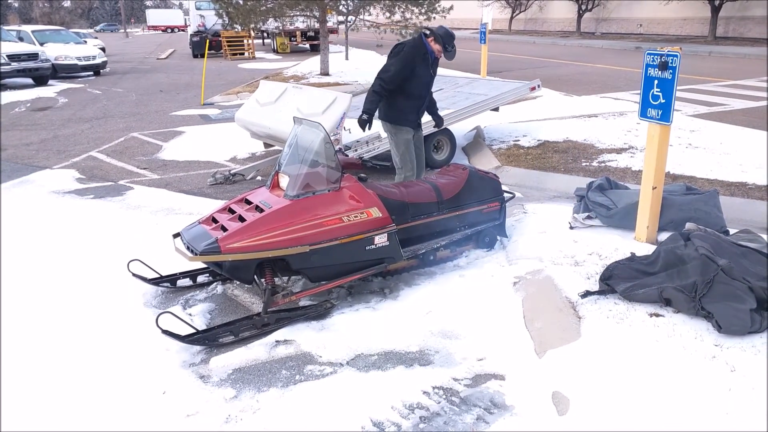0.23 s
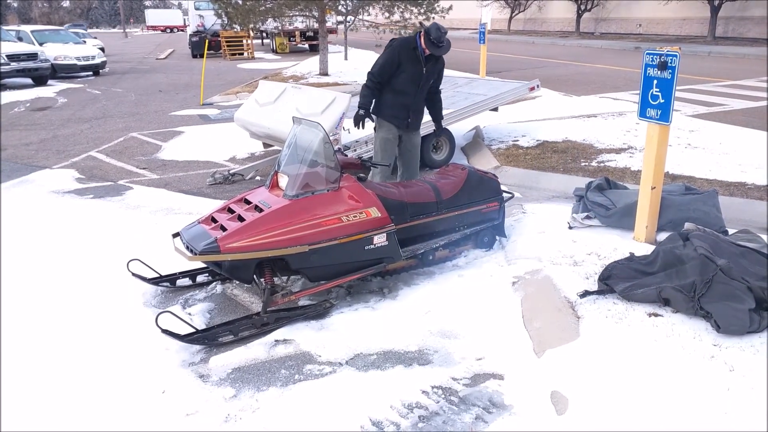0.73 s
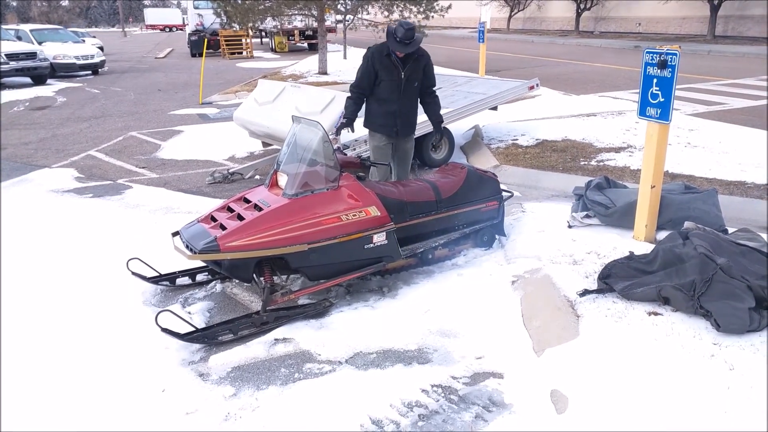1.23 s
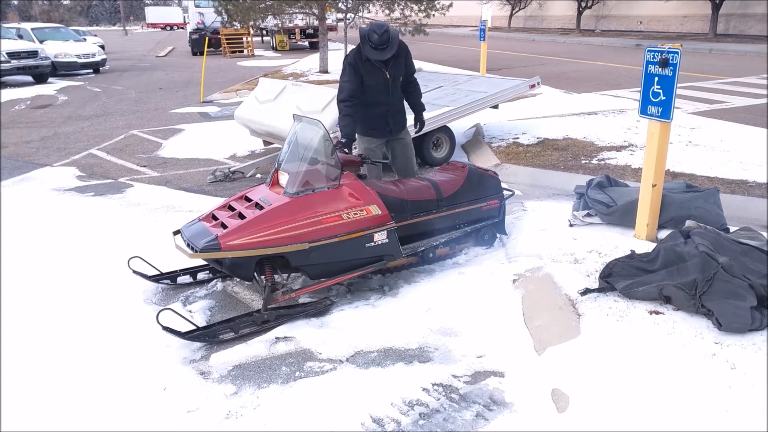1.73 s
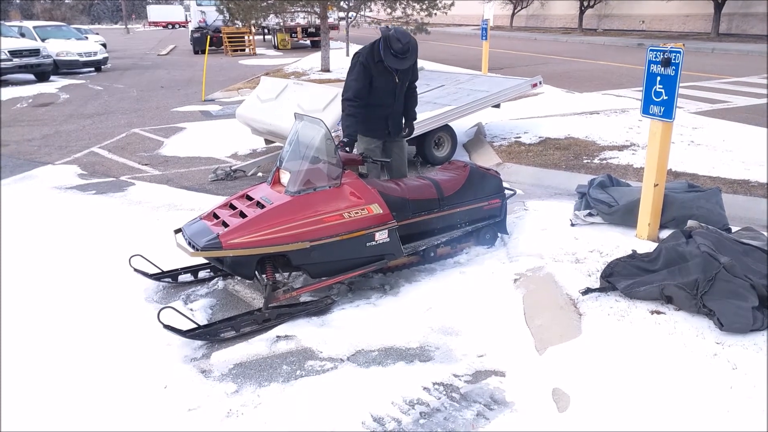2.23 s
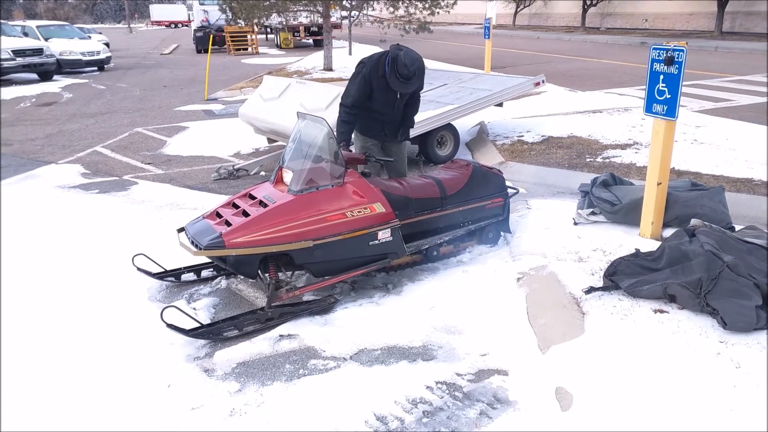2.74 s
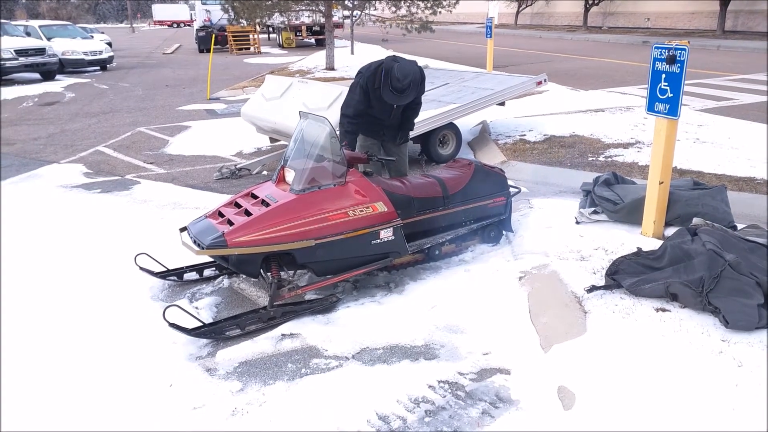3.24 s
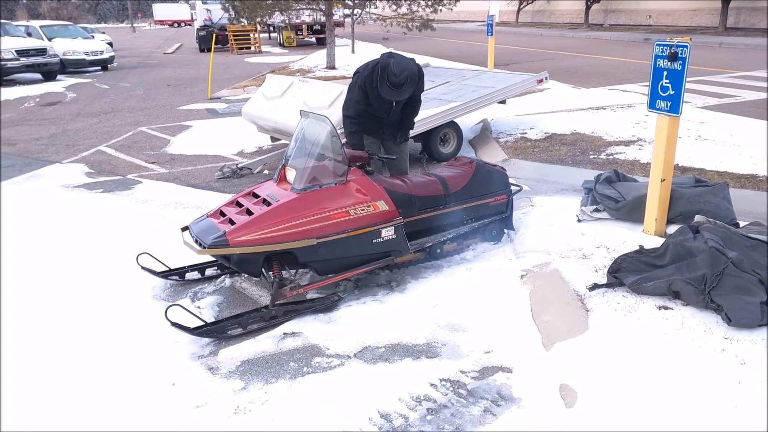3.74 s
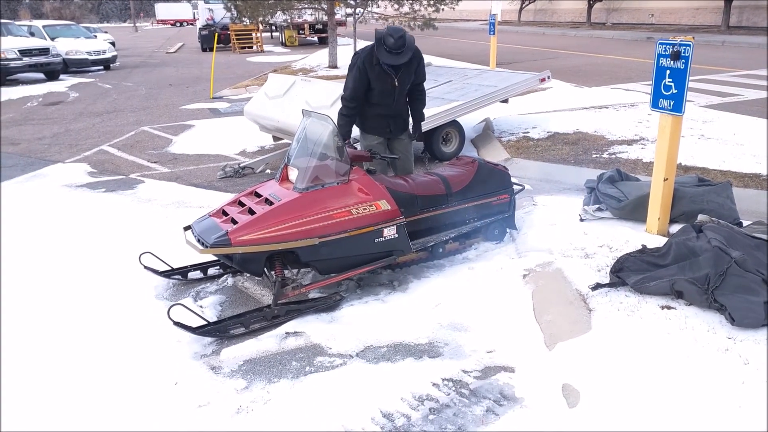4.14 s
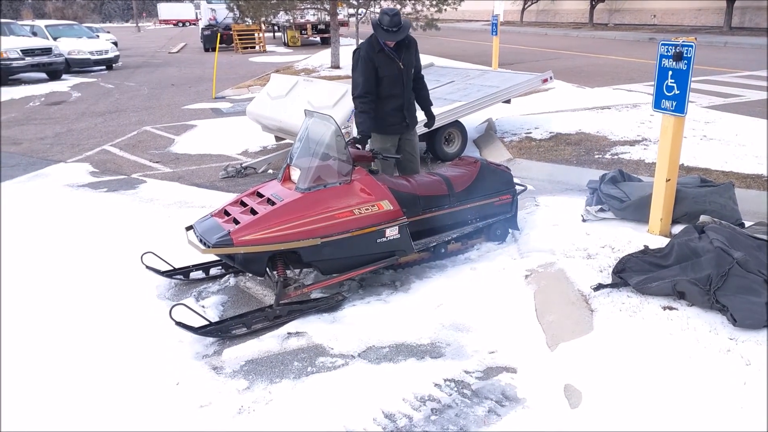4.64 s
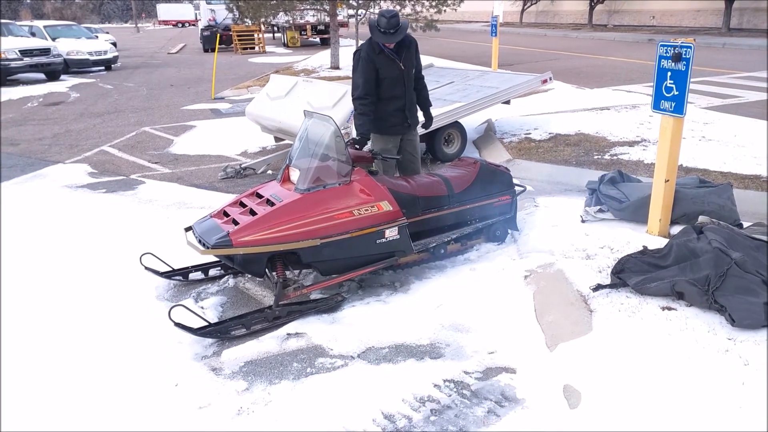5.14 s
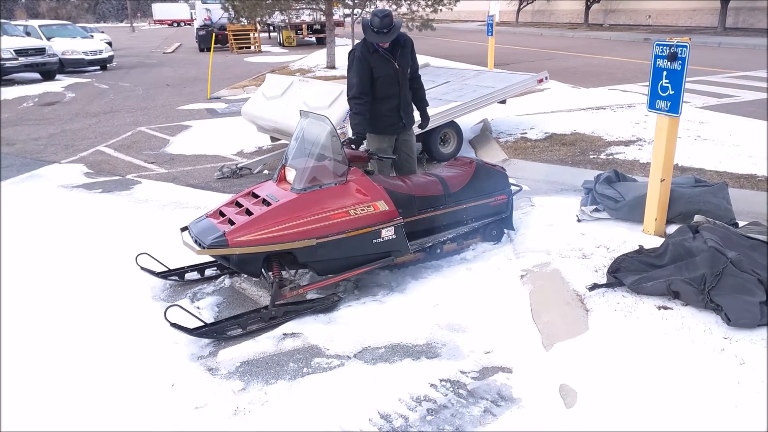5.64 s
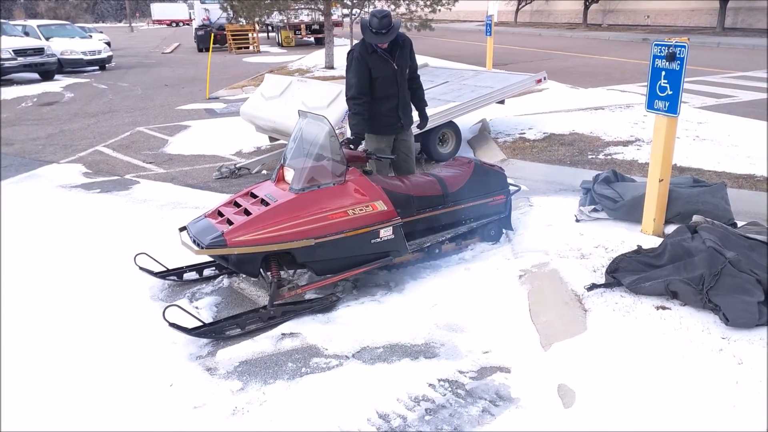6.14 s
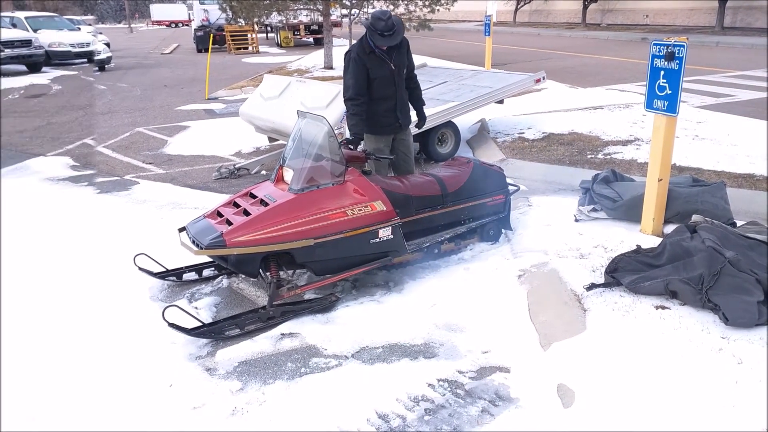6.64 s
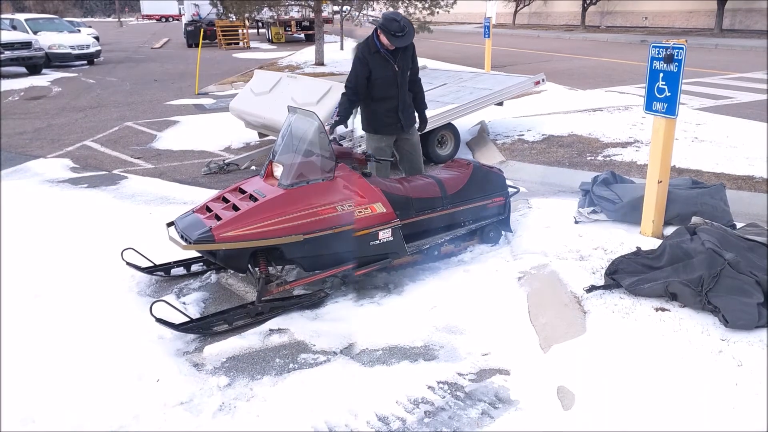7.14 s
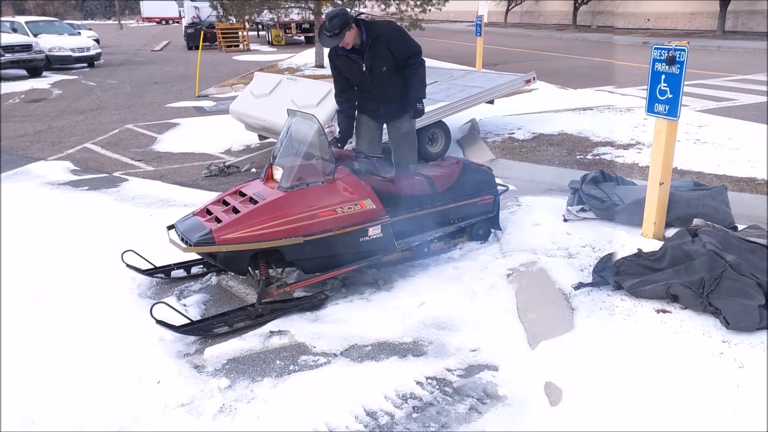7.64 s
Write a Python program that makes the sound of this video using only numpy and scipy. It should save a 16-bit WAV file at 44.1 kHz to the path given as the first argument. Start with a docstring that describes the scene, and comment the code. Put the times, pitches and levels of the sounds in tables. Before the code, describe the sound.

A two-stroke snowmobile engine idles a few metres away in the open, with no room echo. Deep exhaust pops come in irregular pairs about five times a second over low, ragged burble. Sprays of bright metallic clutch chatter, faint rings and a clattering fan sit on top. After about five seconds throttle makes it louder, more regular and raspy, with a low drone that rises and sags.

```python
"""A two-stroke twin snowmobile idles unevenly on snow in an open car park, a few metres from the microphone.
Short runs of strokes fire hard and pop out of the muffler as deep swings; the rest burble as puffs of noise.
The loose drive clutch chatters in sprays of tiny impacts and rings; pistons and fan clatter under the hood.
From about 5 s throttle makes it louder and more regular: engine orders drone in the pipe, and it coughs once."""
import sys
import numpy as np
from scipy import signal
from scipy.fft import rfft, irfft
from scipy.io import wavfile

SR = 44100
rng = np.random.default_rng(int(sys.argv[2]) if len(sys.argv) > 2 else 0)


def store_pcm(level_fs):
    """Save levels as 16-bit WAV."""
    pcm = np.round(np.clip(level_fs, -1, 1) * 32767).astype(np.int16)
    wavfile.write(sys.argv[1], SR, np.atleast_2d(pcm).T)


N = 347508
TIME = np.arange(N) / SR


def gain_of(db):
    """Amplitude factor of a level in dB."""
    return 10 ** (np.asarray(db) / 20)


def evened(x):
    """Scales to rms 1."""
    return x / np.sqrt(np.mean(x ** 2) + 1e-20)


def curve(rows, axis=1):
    """One column of a table at every sample."""
    rows = np.array(rows)
    return np.interp(TIME, rows[:, 0], rows[:, axis])


def spectrum_db(points, hz):
    """A spectrum's dB at any frequency, read along a log frequency scale."""
    point_hz, db = np.transpose(points)
    return np.interp(np.log(hz + 1), np.log(point_hz), db)


def colour(x, points, peaks=()):
    """Filters by a smooth spectrum with resonance bumps on it."""
    hz = np.fft.rfftfreq(2 * N, 1 / SR)
    bumps = sum(height / (1 + (2 * (hz - centre) / width) ** 2) for centre, width, height in peaks)
    return irfft(rfft(x, 2 * N) * gain_of(spectrum_db(points, hz) + bumps))[:N]


def clicks(times, sizes):
    """One impulse at each time."""
    at = np.round(np.asarray(times) * SR).astype(int)
    inside = (at >= 0) & (at < N)
    return np.bincount(at[inside], np.asarray(sizes)[inside], N)


def dying(x, seconds):
    """Gives every impulse an exponential tail."""
    return signal.lfilter([1], [1, -np.exp(-1 / (seconds * SR))], x)


def grit():
    """Noise made of thousands of tiny impacts a second."""
    return evened(rng.standard_normal(N) * (rng.random(N) < .25))


# The hand on the throttle: start_s, strokes_per_s, opening_0_to_1, firing_evenness_0_to_1
THROTTLE = [(0, 56.4, 0.1, 0.15), (5.1, 54.3, 0.08, 0), (5.25, 52, 0.5, 0.7), (5.45, 47.8, 0.34, .92),
            (5.82, 45, .4, 0.7), (6.1, 55.5, 0.92, .68), (6.52, 60.2, 1, .78), (6.9, 53.8, 1, 0.65),
            (7.1, 49, 0.87, 0.57), (7.55, 46, 0.74, 0.79), (7.82, 41.8, 1, 0.72)]
# Runs of hard firings, about five a second: start_s, firings_in_run
HARD_RUNS = [(0.021, 1), (.086, 1), (.210, 2), (.422, 1), (.598, 1), (.758, 1), (.901, 2), (1.086, 2),
             (1.265, 2), (1.417, 2), (1.604, 2), (1.788, 2), (2.006, 2), (2.186, 2), (2.366, 2), (2.517, 2),
             (2.661, 2), (2.786, 2), (3.002, 2), (3.184, 2), (3.365, 2), (3.543, 2), (3.724, 2), (3.905, 2),
             (4.089, 2), (4.272, 2), (4.456, 2), (4.637, 2), (4.820, 2), (5.025, 1), (5.176, 2), (5.505, 2),
             (5.712, 1), (5.859, 1), (6.007, 1), (6.161, 1), (6.490, 1), (6.586, 2), (6.655, 2), (6.730, 3),
             (6.921, 1), (7.016, 1), (7.046, 1), (7.104, 1), (7.198, 2), (7.285, 2), (7.365, 2), (7.420, 3),
             (7.559, 2), (7.669, 1), (7.774, 2)]
IDLE_ENDS_S = 5.3
IDLE_STROKES = 3  # at idle every third stroke of a run fires hard; under throttle, each one


def hard_firings():
    """Each run starts at its time and repeats in step with the crank."""
    start_s, count = np.array(HARD_RUNS).T
    strokes_apart = np.where(start_s < IDLE_ENDS_S, IDLE_STROKES, 1)
    gap_s = strokes_apart / np.interp(start_s, TIME, curve(THROTTLE))
    return np.concatenate([s + gap * np.arange(round(k)) for s, gap, k in zip(start_s, gap_s, count)])


def weak_strokes(hard):
    """The crank turns on evenly between hard firings: the times of the strokes that half fire."""
    hard = np.concatenate([[0], np.sort(hard), [N / SR]])
    turns = np.interp(hard, TIME, np.cumsum(curve(THROTTLE)) / SR)
    steps = np.maximum(np.round(np.diff(turns)), 1).astype(int)
    return np.concatenate([np.linspace(a, b, k + 1)[1:-1] for a, b, k in zip(hard, hard[1:], steps)])


# Strength of the exhaust flow: start_s, level_db
EFFORT = [(0.1, -13), (0.53, -14.5), (0.64, -13.5), (6.21, -12.5), (7.8, -9)]


def pops(hard, weak, pop_db=3.5, scatter_db=1.0, weak_db=-11, weak_scatter_db=4.5,
         follow=0.52, swing_s=0.0021, longer=0.043, lean=0.058):
    """The muffler rounds each firing into one deep swing between two crests; more gas makes it louder and longer."""
    hard_db = pop_db + scatter_db * rng.uniform(-1.77, 1, len(hard))
    half_db = weak_db + weak_scatter_db * rng.uniform(-1.77, 1, len(weak))
    times, levels = np.concatenate([hard, weak]), np.concatenate([hard_db, half_db])
    width_s = swing_s * (1 + longer * curve(THROTTLE, axis=2))
    out = np.zeros(N)
    for s, db in zip(times, levels):
        near = slice(max(round(s * SR) - SR // 60, 0), round(s * SR) + SR // 60)
        u = (TIME[near] - s) / width_s[near]
        swing = (u ** 2 - 1 + lean * u) * np.exp(-u ** 2 / 2)
        out[near] += gain_of(db) * swing
    return gain_of(follow * curve(EFFORT)) * out  # follows only part of the flow's dB


# How the muffler colours the puffs: pitch_hz, level_db
MUFFLER = [(12, -33), (25, -19), (40, -10.5), (57, -2), (75, 2), (110, -1.5), (152, -1), (180, -10.5),
           (230, -14.5), (270, -17.5), (350, -25.5), (450, -39.5), (800, -36), (2500, -87)]


def burble(hard, weak, burble_db=-3, puff_s=0.0019, steady=0.58, sweep_s=0.0042):
    """Half firings leave ragged puffs of gas that rumble in the muffler; each hard firing sweeps them aside."""
    puffs = (steady + dying(clicks(weak, np.ones(len(weak))), puff_s)) * rng.standard_normal(N)
    flow = np.tanh(.5 * evened(colour(puffs, MUFFLER)))  # the outlet limits the flow
    sweep = signal.windows.gaussian(SR // 20, sweep_s * SR / 2)
    swept = signal.oaconvolve(clicks(hard, np.ones(len(hard))), sweep, "same")
    return gain_of(burble_db + curve(EFFORT)) * evened(flow * (1 - .8 * swept))


# How the pipe passes the engine's orders: pitch_hz, level_db
PIPE = [(50, -11), (70, -8), (84, 0.5), (94, 3.5), (115, -7.5), (135, -15), (190, -12), (230, -5),
        (265, -14.5), (310, -14.5), (420, -31.5)]


def drone(drone_db=-4, waver_db=3.0, wander=.025):
    """As firing evens out, engine orders sound through the pipe's resonances; the crank speed wanders."""
    knots = np.linspace(0, N / SR, 200)
    # row 0 wanders the speed, rows 1 to 6 waver the level of each order
    waver = [np.interp(TIME, knots, row) for row in rng.standard_normal((7, len(knots)))]
    hz = curve(THROTTLE)
    turns = np.cumsum(hz * (1 + wander * waver[0])) / SR
    orders = np.zeros(N)
    for k in range(1, 7):
        level_db = spectrum_db(PIPE, k * hz) + waver_db * waver[k]
        orders += gain_of(level_db) * np.cos(2 * np.pi * k * turns)
    evenness = curve(THROTTLE, axis=3)
    return gain_of(drone_db + curve(EFFORT)) * evenness * orders


def cough(at_s=6.886, cough_db=-9):
    """One sharper bark of late-burning mixture thuds in the pipe."""
    t = np.maximum(TIME - at_s, 0)
    modes = [(305, 4.5, 0.042), (480, -7, 0.039), (607, -7, .03)]  # pitch_hz, relative level_db, t60_s
    thud = sum(gain_of(db - 60 * t / t60) * np.sin(2 * np.pi * hz * t) for hz, db, t60 in modes)
    return -gain_of(cough_db) * thud


# Bouts of clutch chatter: start_s, level_db (before scatter), shakes_in_bout
BOUTS = [(0, -36.5, 2), (.178, -35, 2), (.33, -38.5, 3), (.574, -36, 2), (.875, -39, 2), (.997, -39, 1),
         (1.108, -35, 1), (1.185, -37.5, 1), (1.328, -32, 1), (1.473, -36, 2), (1.731, -35, 1),
         (1.923, -39, 1), (2.057, -40.5, 2), (2.198, -39, 3), (2.394, -33.5, 1), (2.551, -41, 1),
         (2.699, -32.5, 1), (2.848, -35, 2), (3.043, -35.5, 2), (3.238, -34, 2), (3.431, -36, 2),
         (3.582, -38, 1), (3.801, -35.5, 2), (4.001, -35.5, 1), (4.183, -35.5, 1), (4.353, -37.5, 2),
         (4.555, -37, 2), (4.759, -36.5, 2), (4.961, -37, 2), (5.107, -38, 3), (5.259, -32.5, 4),
         (5.44, -31, 1), (5.535, -34, 1), (5.686, -35, 3), (5.881, -31.5, 1), (5.957, -32, 3),
         (6.206, -36, 1), (6.354, -30, 1), (6.438, -32, 1), (6.526, -35, 2), (6.70, -35, 2),
         (6.897, -31.5, 1), (7.034, -37, 2), (7.273, -35.5, 1), (7.372, -41, 1), (7.59, -39, 1),
         (7.735, -34, 4)]
SHAKE_GAP_S = .05  # from shake to shake within a bout
SHAKE_S, LONE_SHAKE_S = 0.024, 0.032  # typical lengths; a shake on its own lasts longer


def shakes(scatter_db=2.1, stretch=.2):
    """Every shake of every bout, each a little different: rows start_s, level_db, length_s."""
    rows = []
    for start_s, level_db, count in BOUTS:
        length_s = SHAKE_S if round(count) > 1 else LONE_SHAKE_S
        rows += [(start_s + k * SHAKE_GAP_S, level_db, length_s) for k in range(round(count))]
    s, db, length = np.array(rows).T
    louder, longer = rng.uniform(-1, 1, (2, len(s)))
    return np.transpose([s, db + scatter_db * louder, length * (1 + stretch * longer)])


def stray_shakes(strokes, stray_db=-43, throttle_db=3, share=.06, length_s=0.027):
    """Now and then an ordinary stroke nudges the clutch faintly: rows start_s, level_db, length_s."""
    s = strokes[rng.random(len(strokes)) < share]
    db = stray_db + throttle_db * np.interp(s, TIME, curve(THROTTLE, axis=2))
    return np.transpose([s, db, np.full(len(s), length_s)])


# Colour of the tiny metal impacts: pitch_hz, level_db
CHATTER = [(1500, -16), (2800, -1), (4200, -4), (5400, 0), (6200, -10), (7400, -11), (8600, -1), (10000, 0),
           (11200, -2), (12500, -7), (16000, -8)]


def chatter(rattles, chatter_db=4.5, rise_s=0.0047, tail_s=.009, hold=.75, varied=0.13):
    """Each shake of the clutch weights is a short spray of tiny metal impacts, some duller than others."""
    bright_env, dull_env = np.zeros(N), np.zeros(N)
    t = np.arange(SR // 8) / SR
    for (s, db, length), dullness in zip(rattles, rng.uniform(-0.29, 1, len(rattles))):
        burst = np.minimum(t / rise_s, 1) * np.exp(-np.maximum(t - hold * length, 0) / tail_s)
        first = min(max(round(s * SR), 0), N)
        burst = gain_of(db) * burst[:N - first]
        bright_env[first:first + len(burst)] += burst
        dull_env[first:first + len(burst)] += dullness * burst
    spray = evened(colour(grit(), CHATTER))
    dull = signal.lfilter(*signal.butter(2, 6000, fs=SR), spray)
    return gain_of(chatter_db) * (bright_env * spray + varied * dull_env * dull)


# Modes of the clutch sheaves: pitch_hz, level_db, t60_s
CLUTCH = [(729.6, -1.5, .14), (1131, -9, 0.091), (2113, -0.5, 0.049), (2090, 0, 0.072), (2335, -10, 0.038),
          (4600, -19, .04), (5520, -12, .025)]


def clutch(strokes, jerks, ring_db=-35, lag_s=.02, tap_size=0.17):
    """Soon after each jerk the clutch takes up its play with a knock that rings the sheaves; strokes tap them too."""
    knock_times = jerks + lag_s + 0.00393 * rng.random(len(jerks))
    knocks = clicks(knock_times, np.ones(len(jerks)))
    taps = clicks(strokes, tap_size * rng.uniform(-1.26, 1, len(strokes)))
    t = np.arange(SR // 3) / SR
    ring = sum(gain_of(level - 60 * t / t60) * np.sin(2 * np.pi * hz * t) for hz, level, t60 in CLUTCH)
    ring = ring * (1 - np.exp(-t / 0.0033))  # soft onset
    return gain_of(ring_db) * evened(signal.oaconvolve(knocks + taps, ring)[:N])


# Colour of pistons and fan through the hood: pitch_hz, level_db
HOOD = [(120, -16), (300, -5), (430, -7), (640, -.5), (850, -2.5), (1150, 1.5), (1400, 0), (1750, 0),
        (2300, -4), (2900, -6), (4100, -15), (5550, -15), (6100, -25), (7300, -29), (10000, -22),
        (12500, -29), (16000, -31)]
# Colour of the throttle's rasp: pitch_hz, level_db
RASP = [(300, -8), (600, -8), (950, 3), (1200, 5), (1900, -3), (3600, -9), (4600, -3), (5600, -3),
        (6100, -16), (7300, -18), (10000, -9), (12500, -16), (16000, -19)]
# Panels that the clatter rings: pitch_hz, width_hz, level_db
PANELS = [(667, 96, 3), (1102, 24, 6), (1202, 24, 5.5), (1660, 27, 3), (2093, 85, 8.5), (2344, 21, 8),
          (2416, 36, 6.5), (2792, 43, 6), (2950, 39, 1), (3635, 85, 4.5), (4390, 73, -9.5),
          (5700, 110, -3.5)]


def clatter(strokes, jerks, clatter_db=-24.5, throttle_db=3, rasp_db=-27, surge_db=2.26,
            slap=0.33, lag_s=.004, knock_s=0.015):
    """Piston slap on every stroke over the rush of the cooling fan, through the hood; throttle adds a rasp."""
    size, slip = rng.random((2, len(strokes)))
    slaps = clicks(strokes + lag_s + .002 * slip, 0.076 + size)
    knocks = evened(dying(slaps, knock_s))
    fan = rng.standard_normal(N)
    body = evened(colour(fan + 2 * slap * knocks * grit(), HOOD, PANELS))
    rasp = evened(colour((1 + 1.1 * knocks) * grit(), RASP, PANELS))
    opening = curve(THROTTLE, axis=2)
    mix = gain_of(clatter_db + throttle_db * opening) * body + gain_of(rasp_db) * opening * rasp
    # the whole engine shakes harder after each jerk of the crank
    jerk = dying(clicks(jerks, np.ones(len(jerks))), 0.026)
    return gain_of(surge_db * (jerk - jerk.mean())) * mix


def scene():
    """All parts of the engine, heard in the open with no room."""
    hard = hard_firings()
    weak = weak_strokes(hard)
    strokes = np.sort(np.concatenate([weak, hard]))
    rattles = shakes()
    jerks = rattles[:, 0]  # each jerk of the crank starts a shake
    exhaust = pops(hard, weak) + burble(hard, weak) + drone() + cough()
    drive = chatter(np.vstack([rattles, stray_shakes(strokes)])) + clutch(strokes, jerks)
    return (exhaust + drive + clatter(strokes, jerks))[None]


EDGE_HZ = 16050


def record(dry):
    """At the microphone peaks beyond full scale clip; then a low-pass sets the band limit."""
    low_pass = signal.firwin(511, EDGE_HZ, window=("kaiser", 9), fs=SR)
    return signal.oaconvolve(np.clip(dry, -1, 1), low_pass[None], "same")


dry = scene()
out = record(dry)
store_pcm(out)
```